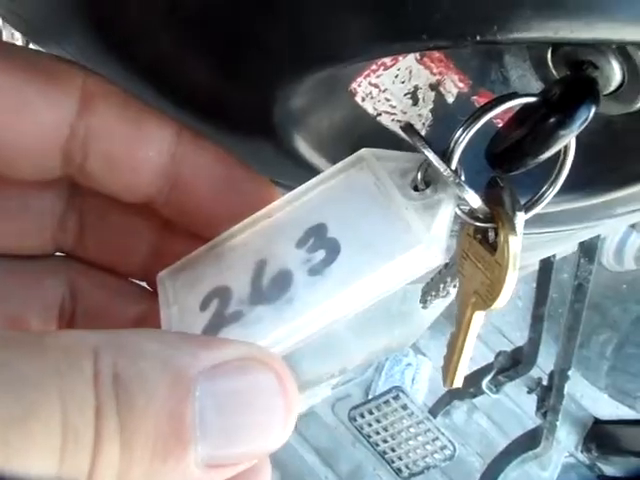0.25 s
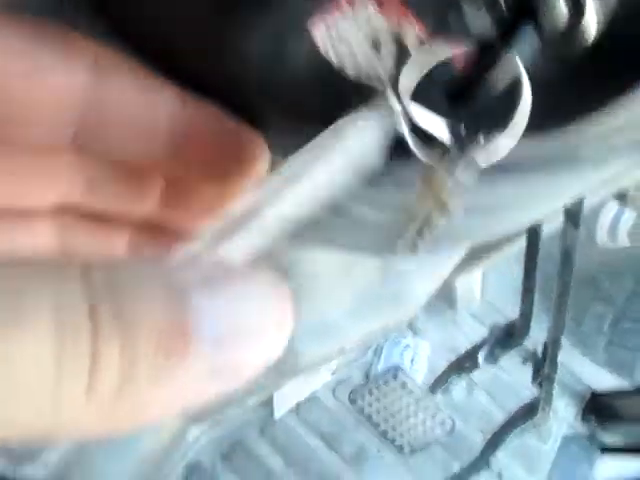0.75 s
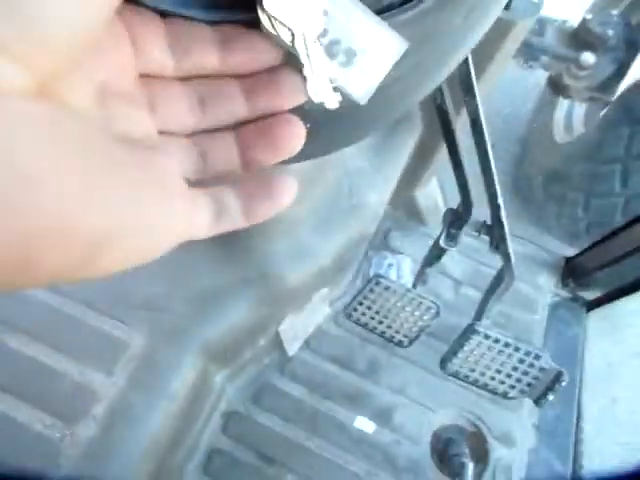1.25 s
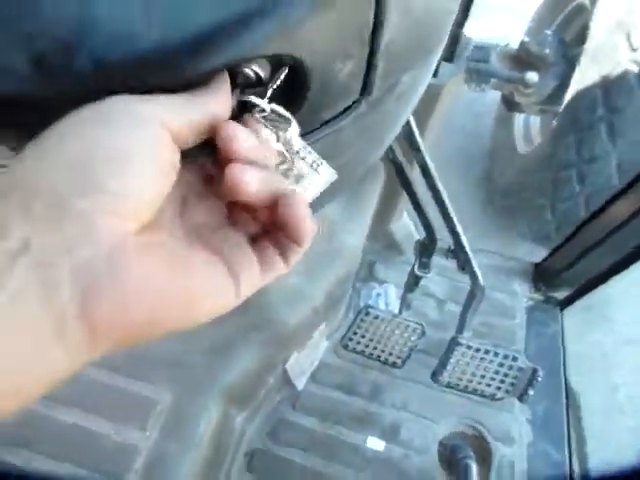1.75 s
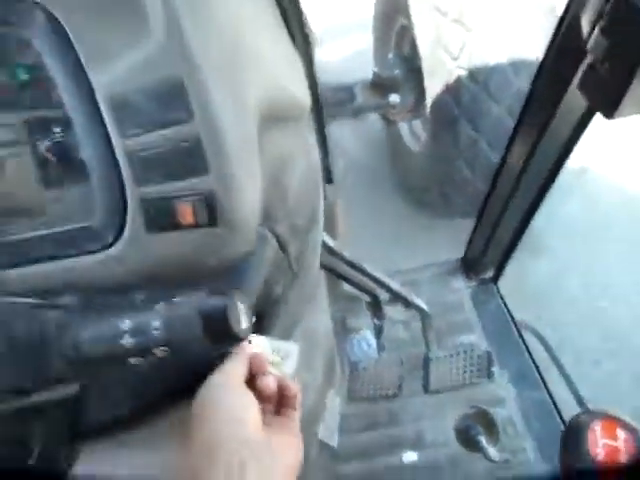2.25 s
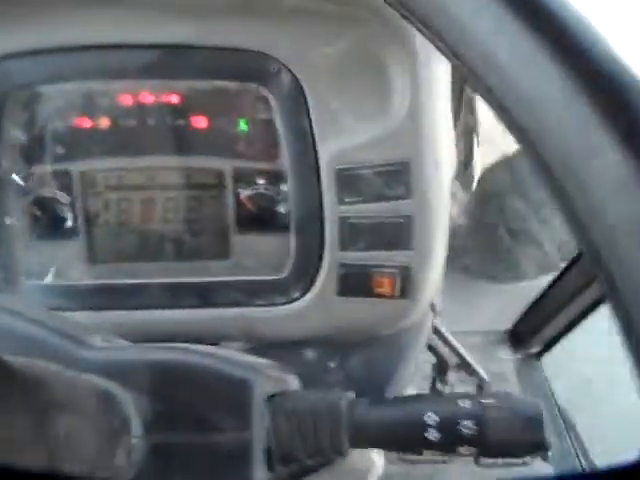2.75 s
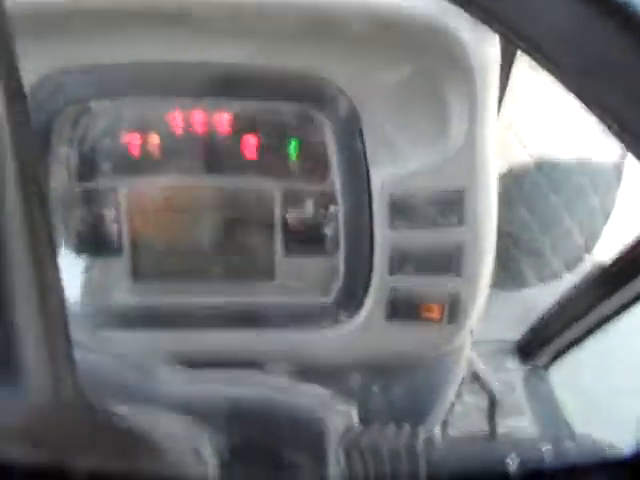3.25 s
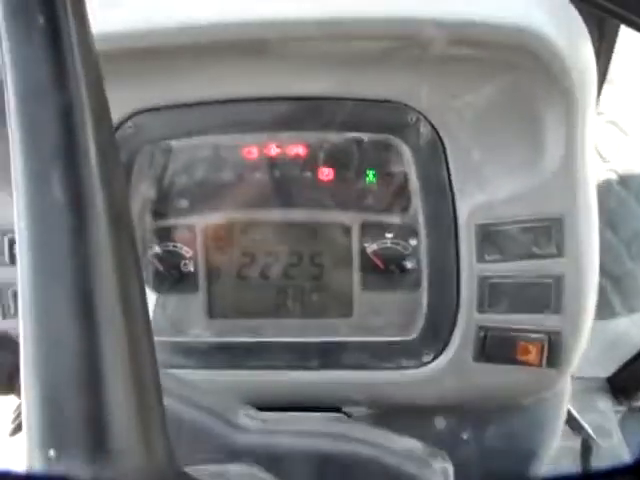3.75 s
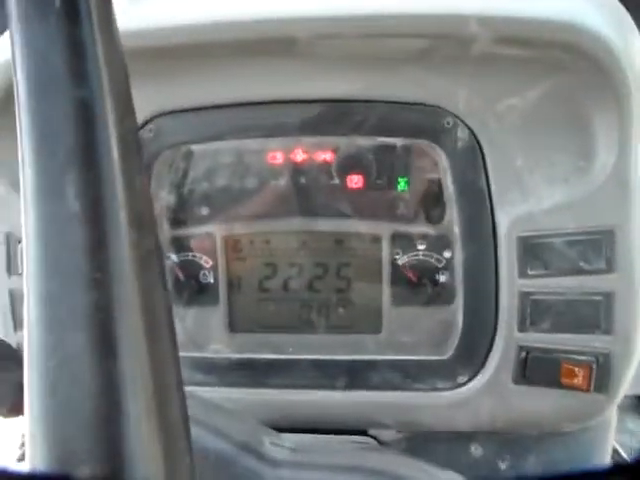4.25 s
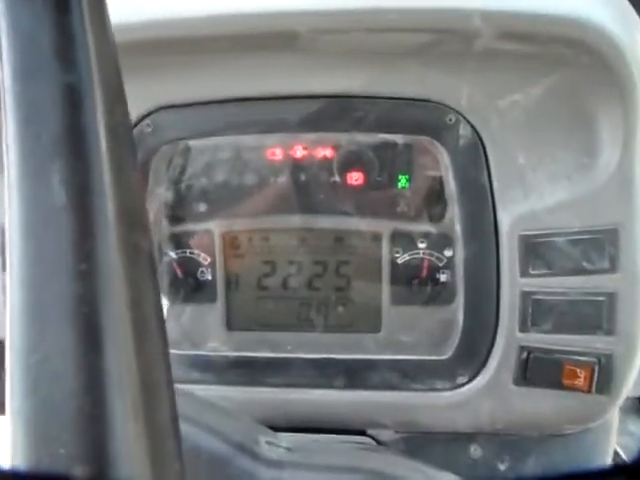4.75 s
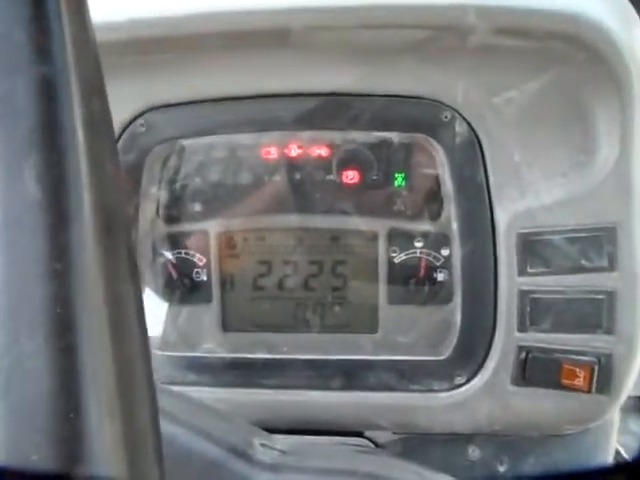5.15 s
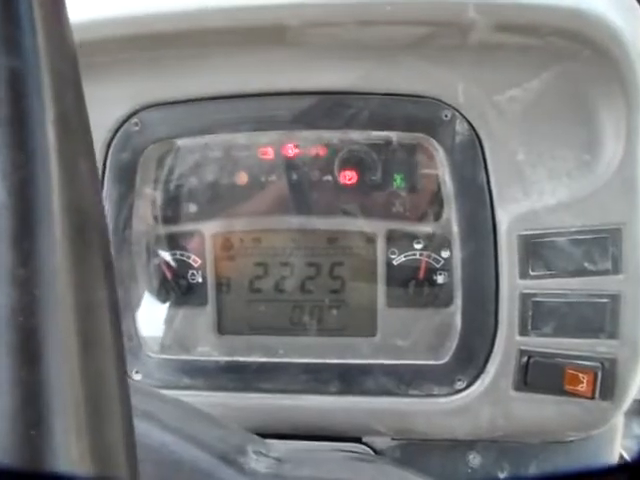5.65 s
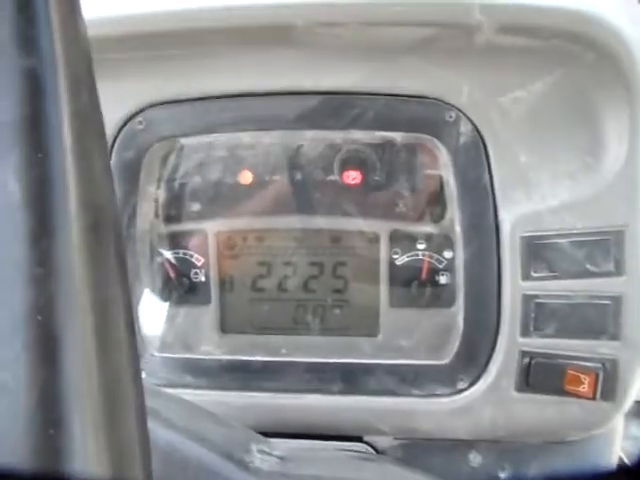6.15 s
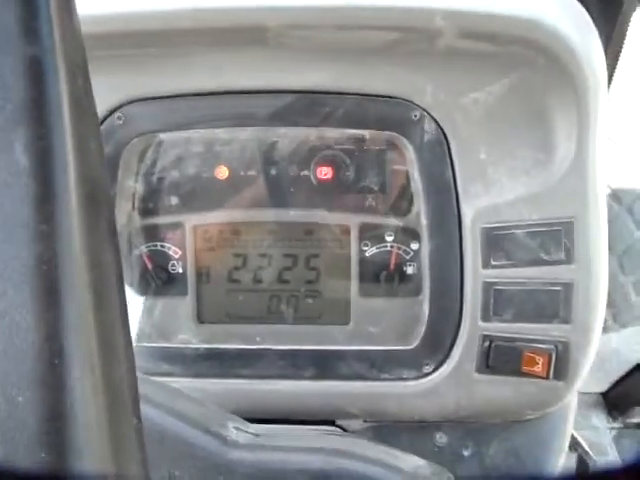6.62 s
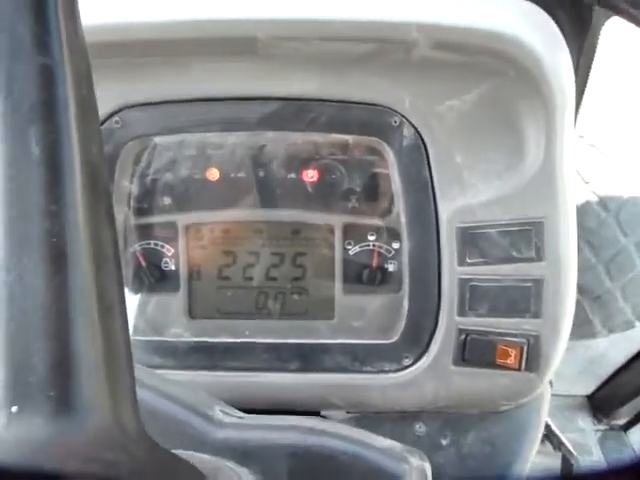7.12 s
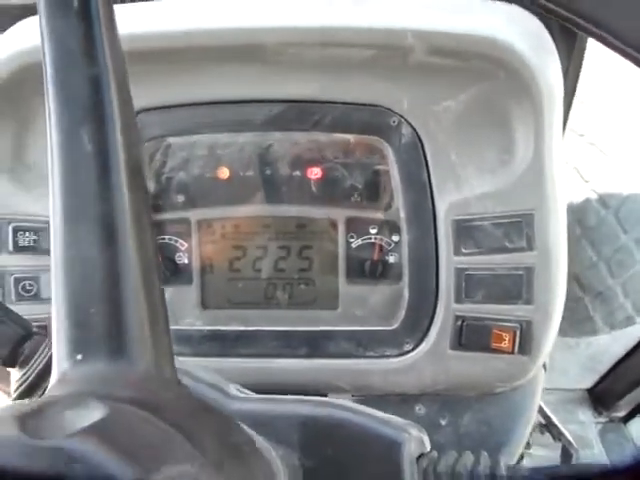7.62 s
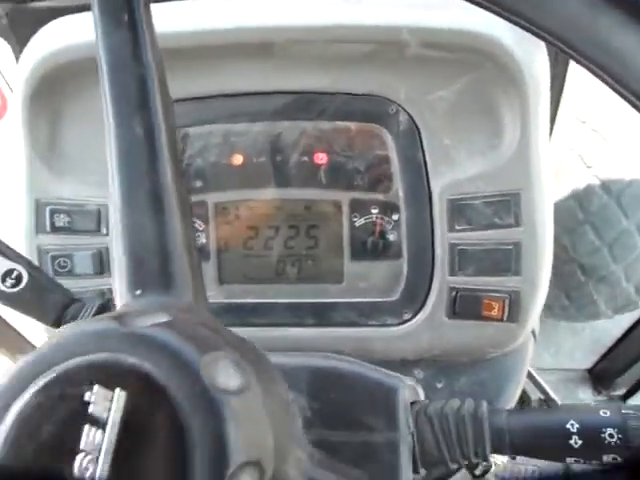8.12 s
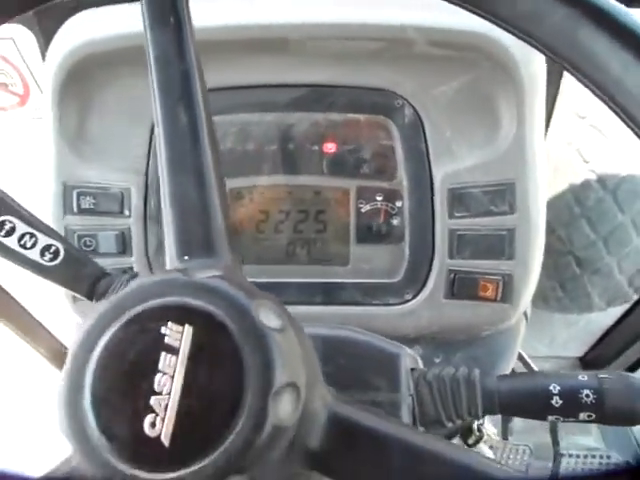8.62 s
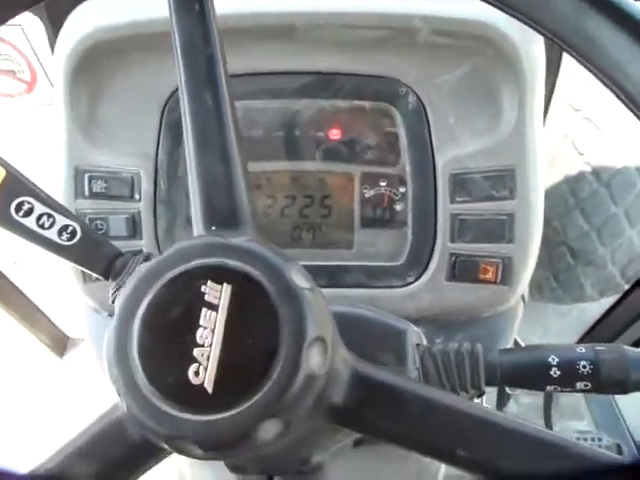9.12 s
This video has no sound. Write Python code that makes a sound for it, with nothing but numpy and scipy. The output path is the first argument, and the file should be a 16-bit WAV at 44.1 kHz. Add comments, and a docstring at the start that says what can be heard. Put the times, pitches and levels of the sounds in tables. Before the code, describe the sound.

A small tractor cab, close stereo microphone, faint low yard rumble and hum. At about 0.8 s fingers rub a plastic tag; sharp clacks and bright key jingles burst around 0.9 s, with duller knocks at 1.35 s and more jingling from 1.5 to 1.7 s. The ignition lock clicks at 2.15 s and a blower runs up over two seconds, airy with a faint rising whine. Small trim and switch clicks come at 2.55 s and 3.3-3.9 s, a soft rub at 4.1 s. At 5.4 s a rub and click lead into a heavy solenoid clunk at 5.5 s, then a short grinding crank, rising in pitch. The diesel catches around 5.8 s with metallic thumps, flares near 6 s, dips at 6.2 s and settles into a steady three-beat idle, one knock hardest, with buzzing panels and ticking valves. Around 8.4 s it becomes brighter and more open, continuing to the end.

```python
"""Tractor cab, microphone pair first near the keys, then behind the steering wheel, finally clear of it.
A hand flips the key tag and the keys jingle: struck plastic as decaying noise, metal as sine modes.
The ignition clicks on and a blower runs up: shaped noise and wavering tones that climb with its speed.
The starter kicks in and cranks: a rising low tone and gear noise. A three-cylinder diesel catches and settles
to a lumpy idle: firing orders shake the cab, noise strikes its resonances, one cylinder knocks hardest."""
import sys
import numpy as np
from scipy import signal
from scipy.fft import rfft, irfft, next_fast_len
from scipy.io import wavfile
from scipy.ndimage import map_coordinates

SR = 44100
rng = np.random.default_rng(int(sys.argv[2]) if len(sys.argv) > 2 else 0)


def wrap_up_sound(samples):
    """Save the sound to the file named by the first command line argument, as 16-bit audio."""
    columns = np.atleast_2d(samples).T
    # keep every value between -1 and 1, then stretch to whole-number steps
    tamed = np.clip(columns, -1, 1)
    steps = np.round(tamed * 32767).astype(np.int16)
    wavfile.write(sys.argv[1], SR, steps)


N = 413658
T = np.arange(N) / SR

# Levels are set inside each layer, before its later gains; spectra and mode levels are relative.
# distant yard rumble: f/Hz, level/dB
YARD_SPECTRUM = [(20, -8), (55, 5.5), (80, -15), (115, -10.5), (150, -20.5), (190, -19.5), (270, -20.5),
                 (450, -25), (700, -26.5), (1050, -29), (1300, -31), (2000, -36), (3000, -44),
                 (14000, -60.5)]
YARD_DB = -41.5
# hum outside
HUM_END_S, HUM_HZ, HUM_DB = 1.3, 113, -52

# air from blower and engine fan: f/Hz, level/dB
AIR_SPECTRUM = [(41, -48), (70, -7), (76, -18), (145, 4), (323, -17.5), (369, 1), (412, -16.5), (451, -4),
                (538, -17), (734, -12), (790, -25), (1900, -29.5), (2900, -36), (3700, -35), (14000, -66)]
# blower tones: f at full speed/Hz, level/dB, pitch waver/share
BLOWER_TONES = [(145, -61, .015), (380, -58, .012), (468, -69, 0.001), (750, -67, .008)]
# ignition on: RUN_UP_S is a time constant; blower level grows as a power of its speed
IGNITION_S, RUN_UP_S, BLOWER_DB, BLOWER_POWER = 2.2, .54, -42.5, 3.5
FAN_DB = -41
# a tone swells as it climbs through the air duct's resonance
DUCT_HZ, DUCT_WIDTH_HZ, DUCT_DB = 440, 15, 15

# fingers rubbing on tag and trim: t/s, length/s, level/dB
RUBS = [(0.764, 0.32, -44), (1.053, 0.13, -57), (1.272, 0.19, -48.5), (1.41, 0.18, -48.5),
        (1.513, .16, -49), (2.428, 0.12, -45.5), (2.732, 0.11, -51), (3.268, 0.22, -55.5),
        (4.114, 0.17, -45.5), (4.385, 0.12, -53.5), (5.04, 0.045, -51), (5.415, 0.16, -39)]
# rubbing noise: f/Hz, level/dB
RUB_SPECTRUM = [(300, 9), (1000, 11.5), (3000, -0.5), (6000, -8.5), (9000, -9.5), (14000, -15.5)]
# keys and plastic tag: t/s, clack level/dB, body level/dB, metal level/dB, clack t60/s, clack f/Hz
KEY_HITS = [(0.88, -28.5, -39, -43, 0.061, 1180), (0.9093, -19, -40, -23.5, 0.009, 7100),
            (0.9136, -17.5, -34, -47, 0.059, 980), (0.934, -26, -37, -25.5, 0.044, 1950),
            (0.9478, -52, -46, -43, .03, 3000), (.959, -52, -43, -34, 0.044, 2000),
            (.969, -36.5, -41, -41, 0.075, 1020), (0.9847, -57, -50, -38, 0.03, 6000),
            (1.0055, -48, -54, -60, 0.023, 3500), (1.263, -45.5, -46, -66, 0.15, 1480),
            (1.289, -42.5, -41, -48, 0.1, 2570), (1.3174, -52, -63, -32.5, .057, 3900),
            (1.3534, -29.5, -27, -49, 0.084, 930), (1.3955, -57, -55, -49, .03, 4000),
            (1.4346, -44, -42, -40, 0.1, 4420), (1.452, -39.5, -41, -43, 0.083, 1880),
            (1.5123, -35.5, -33.5, -30, 0.1, 1160), (1.523, -37, -43, -32, 0.045, 1500),
            (1.532, -33, -42, -26, 0.1, 1720), (1.5338, -27.5, -43, -26, 0.046, 4570),
            (1.55, -38, -45, -45, 0.094, 2000), (1.565, -46, -53, -45, .06, 2200),
            (1.587, -34, -44, -44, .05, 2200), (1.598, -32, -38, -30, 0.061, 1550),
            (1.632, -43, -44, -48, .05, 2400), (1.6387, -40, -37, -53, 0.067, 2130),
            (1.6848, -39, -50, -28, 0.13, 1380), (1.731, -39.5, -49, -44, 0.084, 4760),
            (1.934, -43.5, -41, -38, 0.11, 5450), (4.45, -60, -70, -65, .1, 3700),
            (4.58, -58, -70, -68, .1, 3700), (4.63, -57, -70, -66, 0.11, 4500),
            (5.889, -41, -55, -40, 0.06, 5040), (5.966, -52, -53, -37, .05, 5000),
            (6.0324, -45, -55, -43, .05, 5000), (6.3576, -60, -60, -59, .05, 5000),
            (8.5146, -58, -60, -42, .02, 5000)]
# key and ring modes: f/Hz, level/dB, t60/s
METAL_MODES = [(4650, -13, .088), (6860, -17, .16), (8360, -13, .16), (8970, -6, .12), (9200, -4, .083),
               (10400, -13, .12), (10850, -11, .067), (12250, -12, .1), (12660, -12, .11), (13214, -5, .1)]
# the bunch swings and jingles: t/s, length/s, metal level/dB, tag level/dB
SWINGS = [(0.935, .05, -58, -51), (1.46, .05, -53, -56), (1.535, 0.08, -57, -47), (1.615, .06, -60, -51)]
JINGLE_PER_S, JINGLE_SCATTER_DB = 170, 8
# light touches that let one key or ring mode sing: t/s, f/Hz, level/dB, t60/s
CHIMES = [(.877, 12350, -45, .2), (.947, 13214, -39, .08), (.959, 13214, -26, .075), (.96, 9650, -43, .08),
          (1.32, 13000, -38, .07), (1.464, 8970, -43, .16), (1.467, 13214, -37, .13),
          (1.477, 12700, -38, .09), (1.598, 9150, -46, .09), (6.215, 8970, -59, .3), (6.23, 13214, -60, .2),
          (6.359, 13214, -59, .2), (6.418, 12350, -57, .15)]
# hard plastic when struck: f/Hz, level/dB
CLACK_SPECTRUM = [(500, -45), (1000, 7.5), (1700, 3.5), (3000, 6), (5000, -1.5), (8000, -9), (14000, -46)]
# low thud of a blow: f/Hz, level/dB
BODY_SPECTRUM = [(100, 4), (190, 3.5), (275, 4.5), (400, -6), (650, 0), (1000, -9.5), (1600, -32)]
# treble snap of a blow: f/Hz, level/dB
SNAP_SPECTRUM = [(4000, 2.6), (7000, 3.2), (10000, 5.2), (14000, 1)]
# lock, switches and trim:
# t/s, peak level/dB, body level/dB, treble level/dB, echo level/dB re peak, f/Hz, lock ring level/dB
CLICKS = [(2.1499, -39.5, -38, -41, 2, 1410, -55), (2.158, -30.5, -31.5, -46, -11.5, 2350, -31),
          (2.2214, -48.5, -41.5, -48, 4, 1010, -40), (2.5543, -36, -47, -52, -3.5, 1570, -48),
          (2.5753, -39.5, -61, -61, -10, 3300, -58), (3.267, -32.5, -35, -62, -11, 1450, -60),
          (3.3578, -37.5, -62, -60, -26, 2850, -70), (3.3967, -40, -56, -53, -12, 2740, -65),
          (3.409, -40, -45, -63, -13, 7400, -65), (3.4196, -32.5, -38.5, -64, -10, 1460, -58),
          (3.458, -37.5, -37, -66, -7.5, 1370, -45), (3.571, -39, -67, -75, -27, 4930, -75),
          (3.865, -43.5, -40.5, -57, -9, 1880, -65), (5.3927, -48, -43, -54, -19, 1060, -60),
          (5.4295, -43, -38, -49.5, 2.5, 1590, -56), (5.477, -40, -60, -58, 6.5, 1900, -55),
          (8.33, -40, -52, -65, -22, 5500, -70)]
# ignition lock housing: f/Hz, level/dB, t60/s
LOCK_MODES = [(651, -2, 0.17), (1220, -11, 0.076), (1880, -19, 0.083), (2230, -17, .08), (2530, -22, .06)]
# sprung switches and catches: t/s, level/dB, lower f/Hz, upper f/Hz, t60/s
SPRINGS = [(2.5546, -41, 1950, 4080, .05), (3.42, -23, 1380, 3050, .007), (3.571, -35, 2750, 3150, .009)]

# heavy blows on the cab, from the hand, the starter pinion and the first firings:
# t/s, boom level/dB, panel level/dB, clank level/dB, clank t60/s, column level/dB
THUMPS = [(0.912, -62, -35, -55, .05, -42), (1.355, -33.5, -27.5, -51, 0.16, -20),
          (1.373, -36.5, -29, -54, .11, -25), (2.85, -35, -43, -64, .1, -37),
          (5.477, -57, -63, -33, 0.31, -56), (5.501, -23, -26, -21, 0.086, -42),
          (5.535, -33, -23.5, -33.5, 0.2, -50), (5.808, -33, -22.5, -23.5, 0.19, -36),
          (5.916, -44, -44, -23.5, 0.079, -46), (5.962, -33, -46, -25, 0.078, -48),
          (6.052, -49, -27, -29, 0.15, -46)]
# the whole cab on its mounts: f/Hz, level/dB, t60/s
BOOM_MODES = [(30.2, -1.5, 1), (46.6, 12, 0.44)]
# cab panels: f/Hz, level/dB, t60/s
PANEL_MODES = [(81.5, 1.5, 0.27), (88, -15, 0.27), (116.3, 2, 0.33), (154, -24, 0.14), (181, -8, 0.32),
               (253, -12, 0.35), (294, -16.5, 0.45), (344, -20, 0.39)]
# steering column shroud: f/Hz, level/dB, t60/s
COLUMN_MODES = [(280.3, -6, 0.21), (574, -11, 0.16), (835, -3.5, 0.035), (1150, -15, 0.11),
                (1387, -22, 0.12), (1750, -28, .12)]
# loose metal around the engine: f/Hz, level/dB
CLANK_SPECTRUM = [(200, -1), (310, -27), (355, 24.5), (410, -8), (600, -1), (900, 11.5), (1200, -0.5),
                  (1900, -3), (2900, -3), (3800, -4), (8000, -21), (14000, -42)]

# starter solenoid and pinion slamming home: t/s, level/dB
PLUNGER_KNOCKS = [(5.4766, -42), (5.493, -29.5), (5.504, -32.5)]
# solenoid and flywheel housing: f/Hz, level/dB, t60/s
HOUSING_MODES = [(358, 3, .13), (560, -9, .08), (950, 0, .1), (1290, -8, .07), (1850, -3, .09),
                 (2020, -7, .08), (2460, -7, .08), (2950, -8, .07), (5000, -19, .06)]
# starter gears: f/Hz, level/dB
WHIRR_SPECTRUM = [(200, 11.5), (320, -13), (355, 18), (395, 7), (460, -1), (520, 12.5), (580, -5), (735, 7),
                  (950, 2.5), (1100, -8), (1400, -5), (1850, -5.5), (2200, -5), (2750, -0.5), (3300, -6.5),
                  (3900, -2), (5000, -9.5), (12000, -35.5)]
# starter engages, then drops out and coasts (COAST_S is a time constant)
ENGAGE_S, RELEASE_S, COAST_S = 5.51, 5.92, .13
# the rocking climbs in pitch, holds its level, then fades (ROCK_FADE_S is a time constant)
ROCK_HZ, ROCK_RISE_HZ_PER_S, ROCK_DB, ROCK_HOLD_S, ROCK_FADE_S = 38.3, 34.3, -21, 0.091, 0.23
WHIRR_DB, WHIRR_RISE_DB_PER_S = -37.5, 8
# the pinion's teeth mesh at a multiple of the rocking rate, and grind unevenly
TEETH_PER_ROCK, TOOTH_DEPTH, GRIND_DB = 2.5, .3, 1

# engine speed: t/s, four-stroke cycle rate f/Hz
ENGINE_SPEED = [(5.5, 5.0), (5.8, 6.2), (6.0, 6.0), (6.2, 5.55), (6.5, 5.534), (9.4, 5.538)]
IDLE_HZ = ENGINE_SPEED[-1][1]
HARD_FIRING_S = 7.490
CATCH_S, CATCH_RISE_S = 5.8, 0.12
# the governor overfuels, then cuts back once: t/s, half width/s, fuel level/dB re idle
GOVERNOR = [(5.98, 0.21, 4.5), (6.2, 0.07, -5.5)]
# dB that the layers gain per dB of fuel
SHAKE_PER_FUEL, KNOCK_PER_FUEL, HISS_PER_FUEL = 0.53, 0.17, 1.9
# engine layers at idle, microphone behind the wheel
SHAKE_DB, DRONE_DB, RUMBLE_DB, KNOCK_DB, CLATTER_DB, HISS_DB = -19, -35, -46, -37.5, -41, -60.5
# loose parts, relative to their tables; they start to ring only as the idle steadies
BUZZ_DB, PING_DB, SETTLE_S, UNSETTLED_DB = -1.5, 0, .8, -7
# firing orders: multiple of the cycle rate, level/dB
ORDERS = [(3, -15), (4, -32), (5, -31), (6, -13), (8, -34), (9, -23), (11, -41), (13, -41), (18, -41),
          (20, -53.5), (21, -39.5), (26, -46), (27, -51), (33, -46), (64, -50.5)]
# engine mounts
MOUNT_HZ, MOUNT_Q = 24.8, 30
# firing of each cylinder: place in the cycle/0-1, knock level/dB, clatter level/dB
CYLINDERS = [(0, -6.5, -3.5), (0.323, -11, -8.5), (0.652, -13, -7)]
# resonances that the knock excites: f/Hz, width/Hz, level/dB
KNOCK_MODES = [(303, 46, 0), (354.6, 26, -1.5), (566, 120, -4), (655, 45, -2), (790, 150, 2), (950, 90, -2)]
# panels and brackets jolted by the firings: place in the cycle/0-1, f/Hz, level/dB, decay/cycles
BUZZES = [(0, 350, -27, .06), (.15, 355, -28, .13), (.33, 355, -33, .12), (.005, 572, -29, .055),
          (.66, 560, -31, .05), (.995, 765, -26, .06), (.59, 740, -33, .06), (.88, 655, -35, .05),
          (.06, 180, -30, .07), (.7, 165, -36, .08), (.66, 300, -37, .12), (.14, 530, -31.5, .09),
          (.47, 650, -35, .07), (.31, 700, -35, .06), (.01, 950, -36, .05), (.7, 945, -38, .05),
          (.665, 1280, -40, .045)]
# rise in cycles, level scatter, phase waver and its rate per Hz of pitch
BUZZ_RISE, BUZZ_SCATTER_DB, BUZZ_WAVER_RAD, BUZZ_WAVER_PER_HZ = .04, 1.3, .55, .25
# engine covers: f/Hz, level/dB
CLATTER_SPECTRUM = [(600, 5), (1000, -8), (1220, 7.5), (1600, 0.5), (2000, -3), (2700, -3), (3800, -5.5),
                    (4800, -16), (7000, -31), (14000, -64)]
# rocker cover and injector lines: f/Hz, width/Hz, level/dB
COVER_MODES = [(1165, 35, -3), (1930, 40, 0), (2085, 60, 2), (2230, 50, 1), (2390, 80, 2), (2680, 60, 0)]
# valve and injector ticks: place in the cycle/0-1, level/dB
TICKS = [(.12, -13), (.22, -11), (.3, -13), (.625, -7), (.8, -15), (.96, -11)]
# hiss of the ticks: f/Hz, level/dB
HISS_SPECTRUM = [(2650, -14), (4500, 0), (5500, -3), (8000, -5), (10000, -9), (14000, -17)]
# thin steel that rings as injectors fire and valves seat:
# place in the cycle/0-1, f/Hz, width/Hz, level/dB, decay/cycles
PINGS = [(.965, 2150, 240, -46, .08), (.99, 2500, 480, -44.5, .08), (.31, 2100, 160, -52, .06),
         (.29, 3850, 350, -54, .05), (.62, 3760, 260, -48, .045), (.63, 7750, 130, -62.5, .08),
         (.13, 5825, 110, -62, .08)]
PING_RISE = .018  # cycles

# scattered sound at the microphone pair: f/Hz, side re mid level/dB
SIDE_SPECTRUM = [(30, -18.5), (150, -27.5), (300, -20), (550, -18.5), (1000, -12.5), (3000, -9.5),
                 (13000, -3.5)]
# near the keys, left minus right: f/Hz, level/dB
KEYS_TILT = [(30, -1.2), (150, -.5), (500, .4), (1000, -2), (4000, -1.5), (13000, .5)]
# facing the dashboard, left minus right: f/Hz, level/dB
DASH_TILT = [(30, -2), (150, -.5), (650, .5), (1200, -3.3), (4000, -4.2), (13000, -4.5)]
# the microphone turns towards the dashboard
TURN_S, TURN_TAKES_S = 3.17, 0.54
# it draws back from behind the steering wheel (tanh midpoint and scale), and the engine gets brighter
DRAW_BACK_S, DRAW_BACK_SCALE_S = 8.4, 0.27
OPEN_KNOCK_DB, OPEN_CLATTER_DB, OPEN_HISS_DB, OPEN_BUZZ_DB = 3, 3, 4.5, -1
# sound reaches the left port late, then early once the microphone draws back
LAG_BEHIND_WHEEL_S, LAG_CLEAR_S = .000095, -.00004
WHEEL_SCATTER_DB = 6
TOP_HZ = 14150


def undb(db):
    """Decibels to gain."""
    return 10 ** (np.asarray(db) / 20)


def unit(x):
    """Scale to rms 1."""
    return x / np.sqrt(np.mean(x ** 2) + 1e-20)


def ramp(s, takes_s):
    """Rises from 0 to 1, starting at a time."""
    return np.clip((T - s) / takes_s, 0, 1)


def curves(table):
    """Each column of a table as a control over time."""
    s, *columns = np.transpose(table)
    return [np.interp(T, s, c) for c in columns]


def gains(points, size):
    """A (Hz, dB) spectrum on the bins of a transform, joined over log frequency."""
    hz, db = np.transpose(points)
    bins_hz = np.fft.rfftfreq(size, 1 / SR) + 1
    return undb(np.interp(np.log(bins_hz), np.log(hz), db))


def colour(x, points):
    """Filter by a (Hz, dB) spectrum."""
    size = next_fast_len(len(x))
    return irfft(rfft(x, size) * gains(points, size), size)[:len(x)]


def noise(points, size=N):
    """Coloured noise of rms 1."""
    return unit(colour(rng.standard_normal(size), points))


def resonate(x, hz, width_hz):
    """One resonance, gain 1 at its centre."""
    return signal.lfilter(*signal.iirpeak(hz, hz / width_hz, SR), x)


def walk(rate):
    """Slow chance with a spread near 1, from random knots at a rate per second."""
    knots = rng.standard_normal(int(N / SR * rate) + 2)
    return np.interp(T * rate, np.arange(len(knots)), knots)


def fade(t60):
    """Half a second of exponential decay."""
    return np.exp(-np.log(1000) * T[:SR // 2] / max(t60, .004))


def burst(points, t60):
    """A blow into many dense, short modes, as decaying noise."""
    return noise(points, size=SR // 2) * fade(t60)


def ring(modes, scatter_db, detune):
    """Struck modes; each blow weights and tunes them a little differently."""
    chance = rng.standard_normal((len(modes), 2))
    out = 0
    for (hz, db, t60), (weight, tune) in zip(modes, chance):
        sine = np.sin(2 * np.pi * hz * (1 + detune * tune) * T[:SR // 2])
        out = out + undb(db + scatter_db * weight) * fade(t60) * sine
    return out


def clack(hz, t60):
    """Hard plastic struck; each spot that is hit favours other modes, one of them most."""
    patches = list(zip(np.geomspace(400, 14000, num=60), 4 * rng.standard_normal(60)))
    wide = colour(noise(CLACK_SPECTRUM, size=SR // 2), patches)
    return unit(wide + undb(7.0) * resonate(wide, hz, hz / 3)) * fade(t60)


def tone(hz, db, waver):
    """A line that wavers in pitch and level."""
    level = undb(db + 2 * walk(5.4)) * np.sqrt(2)
    return level * np.sin(2 * np.pi * np.cumsum(hz * (1 + waver * walk(8))) / SR)


def add(track, s, sound):
    """Mix a sound in at a time."""
    i = int(s * SR)
    track[i:i + len(sound)] += sound[:N - i]


def yard():
    """A low rumble from the yard whose level sways."""
    sway_db = 1.2 * walk(7)
    return undb(YARD_DB + sway_db) * noise(YARD_SPECTRUM)


def outside_hum():
    """A wavering hum outside that dies away."""
    return (1 - ramp(HUM_END_S - .2, 0.16)) * tone(HUM_HZ, HUM_DB, waver=0.011)


def blower_speed():
    """Share of full speed: an exponential approach after the ignition comes on."""
    return 1 - np.exp(-np.maximum(T - IGNITION_S, 0) / RUN_UP_S)


def air():
    """Turbulent air from the blower once the ignition is on, joined in power by the engine's fan."""
    blower = undb(BLOWER_DB) * blower_speed() ** BLOWER_POWER
    level = np.hypot(blower, undb(FAN_DB) * caught())
    return level * undb(walk(6.3)) * noise(AIR_SPECTRUM)


def blower_whine():
    """Tones climb with blower speed, swell in the duct and weaken when the starter draws current."""
    speed = blower_speed()
    supply_db = -6 * ramp(ENGAGE_S, 0.11)
    whine = 0
    for hz, db, waver in BLOWER_TONES:
        duct_db = DUCT_DB / (1 + ((hz * speed - DUCT_HZ) / DUCT_WIDTH_HZ) ** 2)
        whine = whine + tone(hz * speed, db + supply_db + duct_db, waver)
    return speed ** BLOWER_POWER * whine


def rubs():
    """Skin, tag and keys slide over each other and the trim in uneven grains."""
    pressure = np.zeros(N)
    for s, length, db in RUBS:
        add(pressure, s, undb(db) * np.hanning(int(length * SR)))
    grains = undb(3.5 * walk(120) + 3.5 * walk(900))
    return pressure * unit(noise(RUB_SPECTRUM) * grains)


def keys():
    """The tag clacks against the column while key and ring chime."""
    out = np.zeros(N)
    for s, db, body_db, metal_db, t60, hz in KEY_HITS:
        tag = undb(db) * clack(hz, t60) + undb(body_db) * burst(BODY_SPECTRUM, 0.14)
        chime = undb(-18.5) * ring(METAL_MODES, scatter_db=4, detune=.006)
        snap = undb(-2) * burst(SNAP_SPECTRUM, 0.022)
        add(out, s, tag + undb(metal_db) * (chime + snap))
    return out


def jingle():
    """While the bunch swings, key, ring and tag touch lightly at uneven moments."""
    out = np.zeros(N)
    for start, length, metal_db, tag_db in SWINGS:
        count = max(int(length * JINGLE_PER_S), 1)
        for k in range(count):
            # the extra fade damps the metal sooner than its own modes would
            metal = ring(METAL_MODES, scatter_db=5, detune=.018) * fade(.15)
            touch = undb(tag_db) * burst(CLACK_SPECTRUM, 0.04) + undb(metal_db) * metal
            s = start + length * (k + rng.random()) / count
            add(out, s, undb(JINGLE_SCATTER_DB * rng.standard_normal()) * touch)
    return out


def chimes():
    """A key or the ring swings free after a light touch and sings on one mode."""
    out = np.zeros(N)
    for s, hz, db, t60 in CHIMES:
        soft_start = 1 - fade(.01)
        add(out, s, soft_start * ring([(hz, db, t60)], scatter_db=.5, detune=.001))
    return out


def clicks():
    """Lock detents and plastic trim: a sharp snap with a short cab echo; the lock housing rings on."""
    out = np.zeros(N)
    for s, db, body_db, treble_db, echo_db, hz, lock_db in CLICKS:
        crack = undb(4) * clack(hz, .009)
        echo = undb(echo_db) * clack(hz, 0.15)
        housing = undb(lock_db) * ring(LOCK_MODES, scatter_db=1, detune=.003)
        body = undb(body_db) * burst(BODY_SPECTRUM, 0.15)
        treble = undb(treble_db) * burst(SNAP_SPECTRUM, 0.1)
        add(out, s, undb(db) * (crack + echo) + housing + body + treble)
    return out


def springs():
    """A spring snaps over and rings briefly on two resonances."""
    out = np.zeros(N)
    for s, db, low_hz, high_hz, t60 in SPRINGS:
        add(out, s, ring([(low_hz, db, t60), (high_hz, db, t60)], scatter_db=.5, detune=.005))
    return out


def thumps():
    """Heavy blows jolt the cab, ring its panels and steering column and set loose metal clanking."""
    out = np.zeros(N)
    # the heavy cab takes a moment to get moving
    swell = 1 - np.exp(-T[:SR // 2] / .004)
    for s, boom_db, panel_db, clank_db, t60, column_db in THUMPS:
        boom = undb(boom_db) * ring(BOOM_MODES, scatter_db=.5, detune=.01)
        panels = undb(panel_db) * ring(PANEL_MODES, scatter_db=1, detune=.01)
        column = undb(column_db) * ring(COLUMN_MODES, scatter_db=1, detune=.005)
        clank = undb(clank_db) * burst(CLANK_SPECTRUM, t60)
        add(out, s, column + swell * (boom + panels + clank))
    return out


def solenoid():
    """The plunger throws the pinion into the flywheel in three quick knocks that ring the housing."""
    out = np.zeros(N)
    for s, db in PLUNGER_KNOCKS:
        add(out, s, undb(db) * ring(HOUSING_MODES, scatter_db=1, detune=.01))
    return out


def starter():
    """The cranking engine rocks the cab until it catches; the gears whirr louder, then coast."""
    age = np.maximum(T - ENGAGE_S, 0)
    turn = 2 * np.pi * np.cumsum((ROCK_HZ + ROCK_RISE_HZ_PER_S * age) * (age > 0)) / SR
    rock = undb(ROCK_DB) * np.exp(-np.maximum(age - ROCK_HOLD_S, 0) / ROCK_FADE_S) * (1 - caught())
    drive = undb(WHIRR_DB + WHIRR_RISE_DB_PER_S * np.minimum(age, RELEASE_S - ENGAGE_S))
    drive *= np.exp(-np.maximum(T - RELEASE_S, 0) / COAST_S)
    grind = (1 + TOOTH_DEPTH * np.sin(TEETH_PER_ROCK * turn)) * undb(GRIND_DB * walk(60))
    whirr = noise(WHIRR_SPECTRUM) * unit(grind)
    return ramp(ENGAGE_S, 0.092) * (rock * np.sqrt(2) * np.sin(turn) + drive * whirr)


def crank():
    """Four-stroke cycles turned, slightly uneven; whole numbers fall on the hardest firing."""
    cycle = np.cumsum(curves(ENGINE_SPEED)[0]) / SR
    return cycle + .002 * walk(12) - cycle[int(HARD_FIRING_S * SR)]


def caught():
    """Opens as the engine fires up."""
    return ramp(CATCH_S, CATCH_RISE_S)


def fuel_db():
    """Fuel over the idle dose: a flare, a dip, then steady."""
    return sum(db * np.exp(-((T - s) / width) ** 2) for s, width, db in GOVERNOR)


def strokes(cycle, places, rise, decay, scatter_db):
    """An envelope that swells and dies at fixed places of each cycle (rise and decay in cycles)."""
    out = np.zeros(N)
    for place, db in places:
        turns = cycle - place + .5
        count = np.floor(turns).astype(int)
        age = turns - count - .5
        size = undb(db + scatter_db * rng.standard_normal(128))[count % 128]
        out += size * np.exp(np.where(age < 0, -(age / rise) ** 2, -age / decay))
    return out


def rattle(cycle, repeat):
    """Dense metal impacts: a share recurs at the same crank angles, the rest is new each cycle."""
    size = int(SR / IDLE_HZ)
    pattern = rng.standard_normal(size)[(cycle % 1 * size).astype(int) % size]
    repeat = np.clip(repeat, 0, 1)
    return np.sqrt(repeat) * pattern + np.sqrt(1 - repeat) * rng.standard_normal(N)


def engine_body(cycle):
    """Firing orders shake the cab through the engine mounts and drone in its panels."""
    shake, drone = np.zeros(N), np.zeros(N)
    for order, db in ORDERS:
        if order < 10:
            # orders under the mount resonance lead the firing, those above it lag
            ratio = order * IDLE_HZ / MOUNT_HZ
            lag_rad = np.arctan(MOUNT_Q * (ratio - 1 / ratio))
            shake += undb(db) * np.cos(2 * np.pi * order * (cycle + .015) - lag_rad)
        else:
            drone += undb(db + 2.2 * walk(5)) * np.cos(2 * np.pi * (order * cycle + rng.random()))
    firings = np.array(CYLINDERS)[:, [0, 2]]
    drone *= .5 + strokes(cycle, firings, rise=.04, decay=.14, scatter_db=2)
    rumble = noise([(20, 14.0), (45, -6), (80, 14), (130, 17.0), (200, 11.0), (300, 4.0), (600, -39.0)])
    shake = undb(SHAKE_DB + SHAKE_PER_FUEL * fuel_db()) * unit(shake)
    return caught() * (shake + undb(DRONE_DB) * unit(drone) + undb(RUMBLE_DB) * rumble)


def engine_knock(cycle):
    """Each firing strikes the block, which rings in the low mids."""
    firings = np.array(CYLINDERS)[:, [0, 1]]
    blows = .18 + strokes(cycle + .02, firings, rise=.028, decay=.075, scatter_db=1)
    impacts = rattle(cycle, repeat=.5) * blows
    knock = sum(undb(db) * resonate(impacts, hz, width) for hz, width, db in KNOCK_MODES)
    return unit(colour(knock, [(60, -4), (200, -23.0), (300, 3.5), (1000, -7.0), (1600, -24.0), (4000, -22.5)]))


def buzzes(cycle):
    """Loose panels and brackets each ring at their own crank angle, never twice quite alike."""
    out = np.zeros(N)
    for place, hz, db, decay in BUZZES:
        age_s = ((cycle - place + .5) % 1 - .5) / IDLE_HZ
        swell = strokes(cycle, [(place, db)], rise=BUZZ_RISE, decay=decay, scatter_db=BUZZ_SCATTER_DB)
        out += swell * np.cos(2 * np.pi * hz * age_s + BUZZ_WAVER_RAD * walk(BUZZ_WAVER_PER_HZ * hz))
    return out


def pings(cycle):
    """Injectors and valves each ring a narrow steel resonance at their own crank angle."""
    out = np.zeros(N)
    for place, hz, width, db, decay in PINGS:
        steel = resonate(resonate(rattle(cycle, repeat=.3), hz, width), hz, 2 * width)
        out += unit(steel) * strokes(cycle, [(place, db)], rise=PING_RISE, decay=decay, scatter_db=1.5)
    return out


def cover_clatter(cycle):
    """Metal impacts swell around each firing and ring the rocker cover and injector lines."""
    firings = np.array(CYLINDERS)[:, [0, 2]]
    shakes = .33 + strokes(cycle + .012, firings, rise=.036, decay=.1, scatter_db=.7)
    impacts = rattle(cycle, repeat=0.38) * shakes * undb(2.5 * walk(500))
    clatter = colour(impacts, CLATTER_SPECTRUM)
    covers = sum(undb(db) * resonate(clatter, hz, width) for hz, width, db in COVER_MODES)
    return unit(clatter + covers)


def valve_hiss(cycle):
    """Treble noise pulses with the valve and injector ticks."""
    ticks = .5 + strokes(cycle, TICKS, rise=.006, decay=.025, scatter_db=2)
    return unit(noise(HISS_SPECTRUM) * ticks)


def diesel(cycle):
    """Combustion knocks and jolts loose panels, covers clatter, and the valve gear ticks between."""
    fuel, clear = fuel_db(), drawn_back()
    settle_db = UNSETTLED_DB * (1 - ramp(CATCH_S + GOVERNOR[0][1], SETTLE_S))
    knock_db = KNOCK_DB + KNOCK_PER_FUEL * fuel + OPEN_KNOCK_DB * clear
    clatter_db = CLATTER_DB + KNOCK_PER_FUEL * fuel + OPEN_CLATTER_DB * clear
    hiss_db = HISS_DB + HISS_PER_FUEL * np.maximum(fuel, 0) + OPEN_HISS_DB * clear
    knock = undb(knock_db) * engine_knock(cycle)
    buzz = undb(BUZZ_DB + OPEN_BUZZ_DB * clear + settle_db) * buzzes(cycle)
    steel = undb(PING_DB + OPEN_CLATTER_DB * clear + settle_db) * pings(cycle)
    clatter = undb(clatter_db) * cover_clatter(cycle)
    return caught() * (knock + buzz + steel + clatter + undb(hiss_db) * valve_hiss(cycle))


def cab(x):
    """Glass and panels an arm's length away return dense early echoes, mostly above the bass."""
    echoes = colour(rng.standard_normal(SR // 2), [(200, -25), (900, 0), (14000, 0)])
    echoes *= fade(.06) * (T[:SR // 2] > .002)
    echoes *= .27 / np.sqrt(np.sum(echoes ** 2))
    return 0.9 * (x + signal.fftconvolve(x, echoes)[:N])


def drawn_back():
    """0 with the microphone behind the steering wheel, 1 once it is clear of it."""
    return .5 + .5 * np.tanh((T - DRAW_BACK_S) / DRAW_BACK_SCALE_S)


def microphones(direct, diffuse):
    """Scattered sound differs at the two ports; the nearer port hears the direct sound first."""
    turned, clear = ramp(TURN_S, TURN_TAKES_S), drawn_back()
    behind_wheel = turned * (1 - clear)
    side = colour(diffuse, SIDE_SPECTRUM) * undb(WHEEL_SCATTER_DB * behind_wheel)
    lag_s = LAG_BEHIND_WHEEL_S * behind_wheel + LAG_CLEAR_S * clear
    left = map_coordinates(direct + side, [(T - lag_s) * SR], order=3)

    def port(x, share):
        """One port takes its share of the left-right tilt."""
        near = colour(x, [(hz, share * db) for hz, db in KEYS_TILT])
        dash = colour(x, [(hz, share * db) for hz, db in DASH_TILT])
        return (1 - turned) * near + turned * dash
    return np.array([port(left, .5), port(direct - side, -.5)])


def airborne(cycle):
    """One independent draw of the sounds that reach the microphones both direct and scattered."""
    return yard() + air() + rubs() + keys() + jingle() + clicks() + diesel(cycle)


def scene():
    """Airborne sounds arrive direct and scattered; the heavy vibration is the same all over the cab."""
    cycle = crank()
    direct, diffuse = airborne(cycle), airborne(cycle)
    echoed = cab(direct + chimes() + springs() + thumps() + solenoid() + starter())
    return microphones(echoed + outside_hum() + blower_whine() + engine_body(cycle), diffuse)


def record(dry):
    """The recorder cuts the top with a steep low-pass."""
    return signal.sosfilt(signal.ellip(8, .2, 70, TOP_HZ, fs=SR, output="sos"), dry)


dry = scene()
out = record(dry)
wrap_up_sound(out)
```